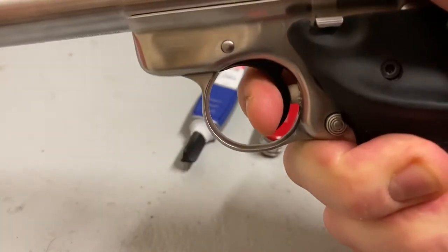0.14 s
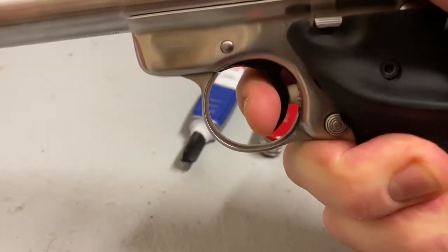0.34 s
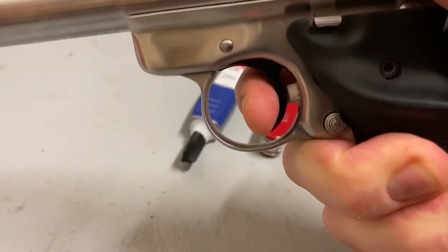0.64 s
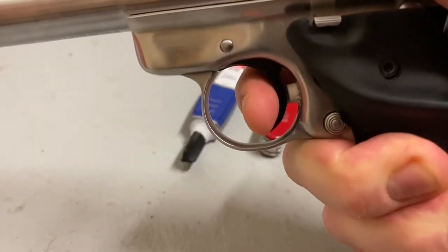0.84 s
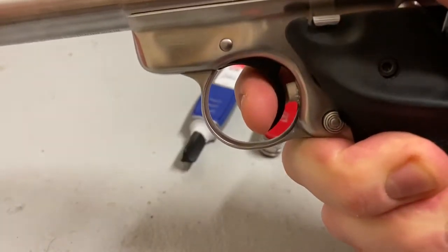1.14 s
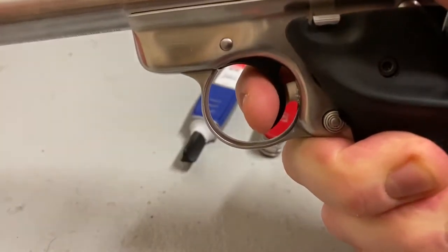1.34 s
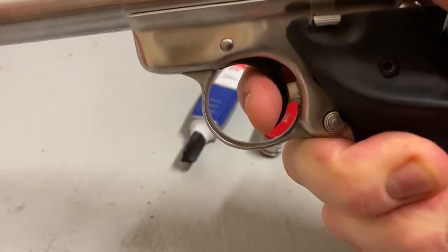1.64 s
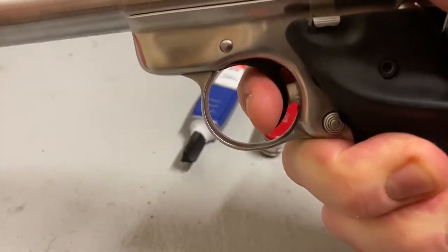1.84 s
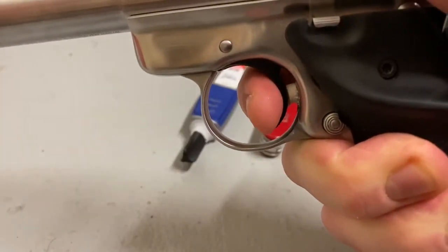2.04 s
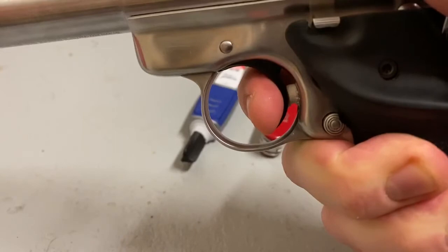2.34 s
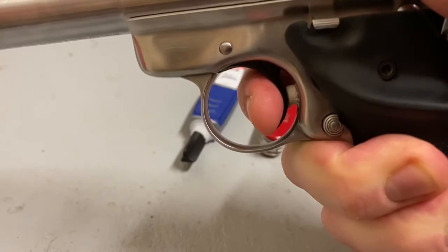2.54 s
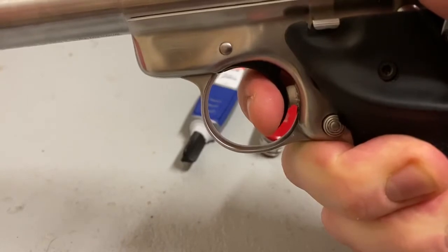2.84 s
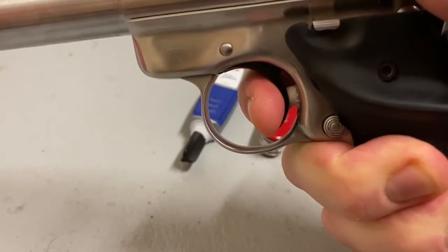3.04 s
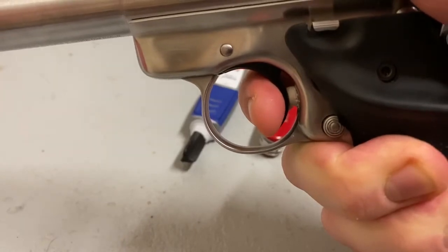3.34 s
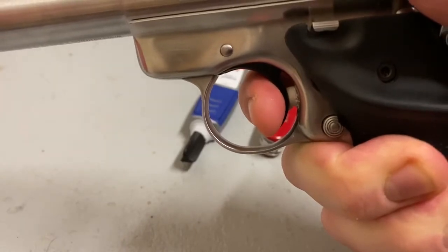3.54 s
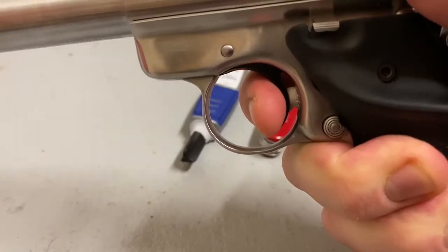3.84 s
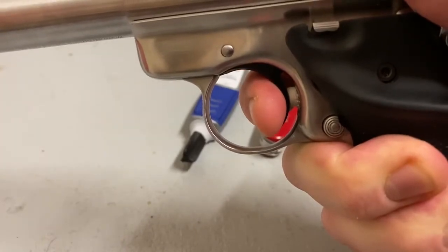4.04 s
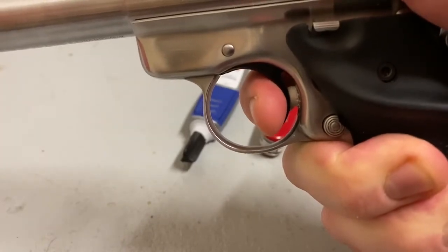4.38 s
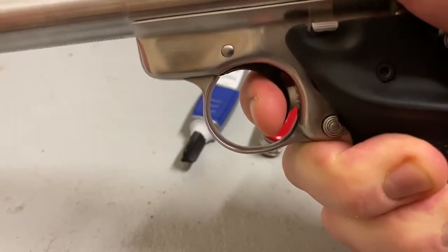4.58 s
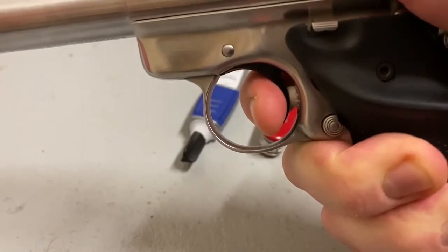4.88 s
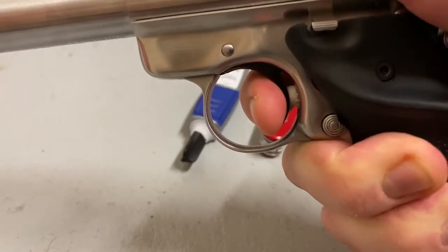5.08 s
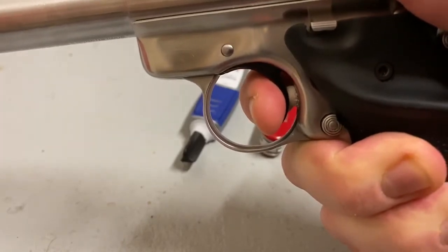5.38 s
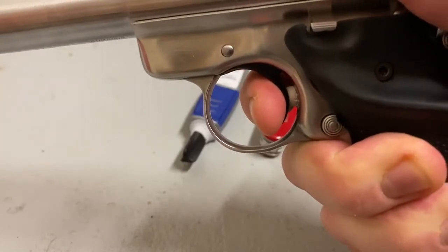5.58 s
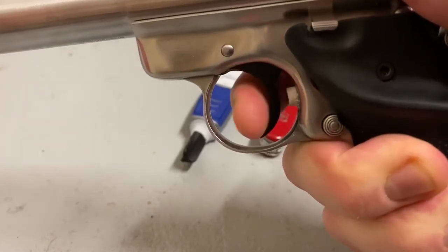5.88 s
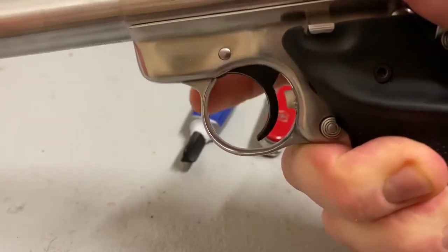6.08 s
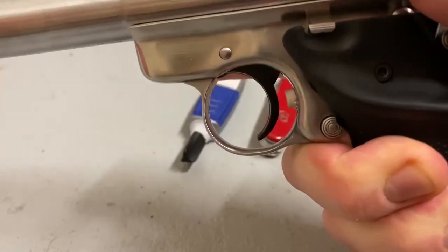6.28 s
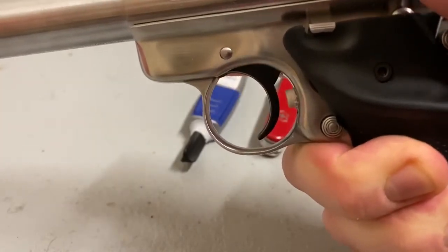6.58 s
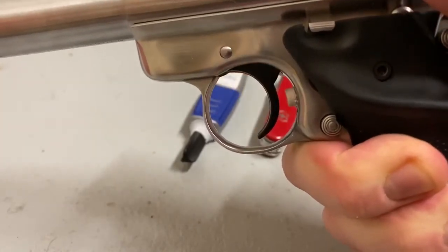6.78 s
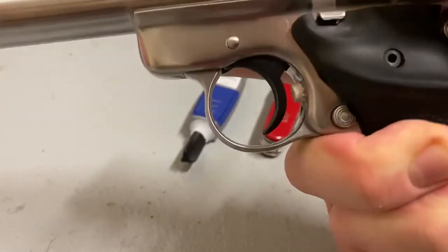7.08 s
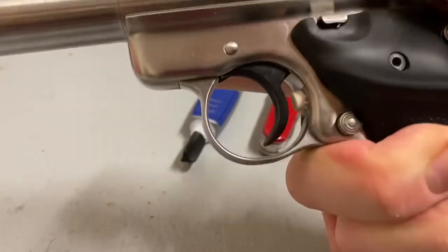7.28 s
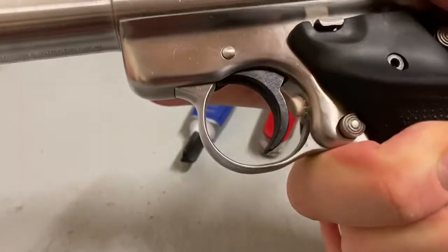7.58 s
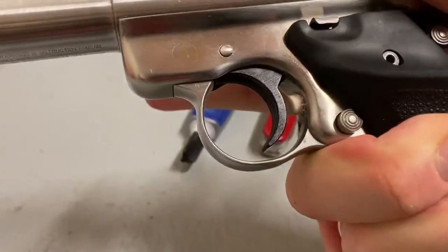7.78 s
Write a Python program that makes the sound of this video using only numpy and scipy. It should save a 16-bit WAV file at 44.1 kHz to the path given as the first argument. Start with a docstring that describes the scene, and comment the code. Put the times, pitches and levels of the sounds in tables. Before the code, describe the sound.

A steel pistol is dry-fired very close to the microphone in a small humming room. A crisp, thin trigger click comes first. After a few seconds the hammer falls with a sharp, loud clack, a short low thud and a fluttering deep boom. The hum gradually sinks and returns, fine ticks mark the trigger's release, and a hand rubs faintly on the grip.

```python
"""A steel pistol is dry-fired close to the microphone in a small room with a motor hum and rushing air throughout.
First the trigger takes up with a click. Later the sear breaks and the hammer falls with a clack, a low thud
and a deep boom, while a limiter turns the sound down for a moment. Then the hum sinks and comes back, the
linkage slides and ticks back as the trigger is let go, and the hand rubs on the grip.
Steel is short noise plus ringing tones, the thud and boom are fading sines, and the air is coloured noise."""
import sys
import numpy as np
from scipy import signal
from scipy.fft import rfft, irfft, next_fast_len
from scipy.io import wavfile
from scipy.ndimage import uniform_filter1d, minimum_filter1d

SR = 44100
rng = np.random.default_rng(int(sys.argv[2]) if len(sys.argv) > 2 else 0)


def inscribe(sig):
    """Save sig as 16-bit PCM at rate SR to the path in sys.argv[1].

    A 1-D sig is mono; a 2-D sig holds one channel per row.
    Samples are clipped to [-1, 1] before scaling.
    """
    pcm = np.round(np.clip(np.atleast_2d(sig).T, -1, 1) * 32767)
    wavfile.write(sys.argv[1], SR, pcm.astype(np.int16))


N = 349354
TIME = np.arange(N) / SR  # seconds

# Steel hitting steel. Each row: start in seconds, overall level in dB, clatter decay time in ms,
# low and high edge of the clatter in Hz, frame ring in dB, linkage ring in dB (both before the overall level).
CONTACTS = [ (1.1525, -11, 1.33, 3600, 15500, -21.5, -4), (1.1538, -19.5, 3.6, 3553, 15500, -13, 0.5),
            (4.4995, -8, 5.5, 2380, 12000, 2, -14), (4.5040, 3, 1.5, 3800, 15000, -11, -5),
            (4.5050, -2.5, 2, 2200, 14100, 9.5, -9.5), (4.5074, -4.5, 3.5, 2200, 13000, 6.5, -9),
            (5.4300, -78.5, 34, 5500, 7500, -30, -31), (5.9108, -44, 4, 1405, 6990, 7.5, -12.5),
            (5.922, -31, 1.3, 3220, 13000, -8, -6.5), (5.9541, -20, 1.04, 6100, 14900, -25, -15.5),
            (5.9795, -65, 2.7, 2000, 13000, 2, -10.5), (6.0495, -49.5, 1.3, 3900, 9000, -3, -13),
            (6.071, -60.5, 4.0, 5000, 15500, 1, -12)]
# Ringing tones of the frame and barrel. Each row: pitch in Hz, relative level in dB,
# time to fall by 60 dB in seconds, left minus right in dB.
FRAME_MODES = [(600, -17, .016, 0), (1005, -19, .024, -3), (1900, -10, .017, 4), (2030, -15, .024, 5),
               (2960, -16, .016, 5), (3150, -13, .016, 5), (3290, -18, .018, 4), (3160, -73, 1.0, 2),
               (4226, -21, .035, 0), (4580, -8, .016, 0), (4750, -14, .014, 0), (4940, -8, .016, 0),
               (4560, -60, .3, 2), (4990, -56, .3, 2), (5300, -39, .17, 2), (5820, -17, .018, 1),
               (7040, -17, .014, 1), (9250, -19, .02, -1), (9520, -17, .016, -1), (10110, -15, .018, -1),
               (13900, -20, .02, -1), (15000, -19, .018, -1)]
# Ringing tones of the trigger bar and sear, with the same columns as the frame.
LINKAGE_MODES = [(1020, -22, .035, -1), (1920, -19, .045, 6), (2180, -14, .022, 6), (2650, -17, .018, 4),
                 (4060, -16, .022, 2), (4630, -14, .02, 2), (5850, -10, .018, 1), (6450, -11, .017, 1),
                 (7100, -10, .018, 1), (9020, -11, .014, 0), (9890, -8, .016, 0), (10700, -16, .014, 0),
                 (14100, -13, .01, 1)]
# The linkage slides as the trigger returns. Each row: middle in seconds, level in dB, half length in seconds.
SLIDES = [(5.945, -65, 0.045), (6.068, -69.5, 0.022)]
# Band of the sliding noise: low and high edge in Hz.
SLIDE_BAND = (1400, 4600)
# The pistol lies to the left. One row: low edge in Hz, high edge in Hz, share gained left and lost right.
LEFTWARD = (1500, 4300, .19)
# The hammer's jolt. Each row: start in seconds, level in dB, start pitch in Hz, end pitch in Hz,
# glide, rise and decay times in ms.
THUDS = [(4.5063, 9.1, 400, 56, 4.2, 1.5, 8.7), (4.5800, -19, 260, 50, 3.5, 1.8, 10.0)]
# The hand shifts on the grip. Each row: middle in seconds, level in dB before the unevenness, half length in seconds.
RUBS = [(6.35, -70, .15), (6.68, -59, .1), (7.4, -72, .35)]
# Colour of the rubbing. Each row: frequency in Hz, relative level in dB per Hz.
GRIP_COLOUR = [(60, -20), (180, 7), (290, 0.5), (420, -8), (800, -36), (3000, -62.5)]
# Reflections of the room. Each row: frequency in Hz, level in dB, time to fall by 60 dB in seconds.
ROOM = [(301, -28.5, .2), (1008, -19, 0.073), (1988, -12.5, .26), (3200, -18, 0.2), (5000, -16, 0.23),
        (9100, -20, 0.22), (15013, -22.5, 0.22)]
# Two motors at nearly the same speed. One row: middle pitch in Hz, peak level of the stronger one in dB,
# time of a loudest moment in seconds, beats per second.
MOTORS = (48.8, -60.5, 1.45, .378)
# Higher tones of the hum. Each row: pitch in Hz, rms level in dB before the waver, spread of the waver in dB.
HUM_OVERTONES = [(94.5, -59.5, 4), (149.8, -61, 3), (198, -75, 1), (496, -73, 2.5)]
# Colour of the rumble. Each row: frequency in Hz, relative level in dB per Hz.
RUMBLE_COLOUR = [(20, -43), (38, -22.5), (50, -19), (65, -4), (85, 3), (102, 5.5), (120, 4.5), (140, -8.5),
                 (155, -9), (175, -14.5), (198, -2), (225, -17), (300, -63.5), (2000, -100)]
# Colour of the air that both sides share. Each row: frequency in Hz, relative level in dB per Hz.
AIR_COLOUR = [(40, -24.5), (150, -6.5), (280, -4.5), (370, 1.5), (600, -5), (870, -10), (1200, -12.5),
              (2400, -22), (4000, -30.5), (7000, -39), (8400, -45), (10000, -48), (12000, -55),
              (16000, -62.5)]
# Colour of the air that is opposite left and right, with the same columns.
AIR_SIDE_COLOUR = [(40, -15), (100, -6), (240, 2.5), (320, -0.5), (750, -8), (1020, -11), (2000, -22),
                   (4000, -35), (8000, -42.5), (10000, -50.5), (16000, -63)]
# Resonances in the air. Each row: centre in Hz, width in Hz, lift in dB.
AIR_PEAKS = [(490.8, 40, 10), (759.2, 48, 8.5), (990, 130, 8.5), (1907, 270, 5), (2780, 570, 3)]
# How alike the two microphone ports hear noise. Each row: frequency in Hz, likeness from 0 to 1.
LIKENESS = [(500, .95), (2000, .8), (5000, .65), (7500, 0), (15000, .05)]
# Colour of the microphone. Each row: centre in Hz, width in Hz, lift or cut in dB.
MICROPHONE = [(5910, 550, -1), (8300, 900, -3.5), (9900, 1300, 6), (11770, 1000, -6.5)]

BOOM_HZ, BOOM_BEAT_HZ, BOOM_DB, BOOM_T60_S = 48.1, 6.7, -23, 0.8
SAG_START_S, SAG_END_S, SAG_DB_PER_S, SAG_RETURN_S = 4.96, 5.85, 10, 0.027
RUMBLE_DB, AIR_DB, AIR_SIDE_DB = -51.5, -61, -61.5
LIMIT_DB, LOOK_AHEAD_S, HOLD_S, RELEASE_DB_PER_S = -9, 0.0075, 0.12, 129.5
CUTOFF_HZ = 15800


def action():
    """Each steel contact is a short burst of clatter that sets the frame and the linkage ringing."""
    out = np.zeros((2, N))
    t = TIME[:SR // 3]
    attack = 1 - np.exp(-t / 0.00035)
    for start_s, level_db, decay_ms, low_hz, high_hz, frame_db, linkage_db in CONTACTS:
        fade = np.exp(-1000 * t / decay_ms)
        clatter = rms_one(band(stereo_noise(len(t)), low_hz, high_hz)) * fade
        frame = from_db(frame_db) * ringing(FRAME_MODES, t, spread_db=-1.0)
        linkage = from_db(linkage_db) * ringing(LINKAGE_MODES, t, spread_db=0.5)
        add(out, start_s, (clatter + frame + linkage) * attack * from_db(level_db))
    return out


def ringing(modes, t, spread_db):
    """Struck steel rings in many fading tones; each blow gives them new strengths and phases."""
    hz, level_db, t60_s, pan_db = np.array(modes).T[:, :, None, None]
    strength, skew = rng.standard_normal((2, len(modes), 1, 1))
    # the less alike the ports are at a pitch, the further out of step they hear it
    angle = np.arccos(np.clip(at_hz(LIKENESS, hz), 0, 1))
    apart = angle * np.sign(skew + 1) / 2 * [[1], [-1]]
    phase = 2 * np.pi * (hz * t + rng.random((len(modes), 1, 1))) + apart
    loudness = from_db(level_db + spread_db * strength - 60 * t / t60_s)
    return np.sum(panned(pan_db) * loudness * np.sin(phase), axis=0)


def slide(catches_per_s):
    """Steel slides on steel in a stream of tiny catches at random moments."""
    catches = (rng.random(N) < catches_per_s / SR) * stereo_noise(N)
    return strokes(SLIDES) * rms_one(band(catches, *SLIDE_BAND, order=1))


def thud():
    """The blow jolts gun and hand: a swing that dies fast while its pitch drops."""
    out = np.zeros((2, N))
    t = TIME[:SR // 5]
    port_lag = np.array([[0], [.5]])  # radians, left and right
    for start_s, level_db, start_hz, end_hz, *spans_ms in THUDS:
        glide_s, rise_s, decay_s = np.array(spans_ms) / 1000
        # turns of the swing so far: the pitch added up over time
        turns = end_hz * t + (start_hz - end_hz) * glide_s * (1 - np.exp(-t / glide_s))
        swing = np.sin(2 * np.pi * turns - port_lag)
        envelope = (1 - np.exp(-t / rise_s)) * np.exp(-t / decay_s)
        add(out, start_s, from_db(level_db) * envelope * swing)
    return out


def boom():
    """Two close, deep tones start with the hammer's jolt and beat against each other as they die."""
    t = np.maximum(TIME - THUDS[0][0], 0)  # stays at zero, so silent, until the jolt
    lower = np.sin(2 * np.pi * (BOOM_HZ - BOOM_BEAT_HZ / 2) * t)
    upper = np.sin(2 * np.pi * (BOOM_HZ + BOOM_BEAT_HZ / 2) * t)
    return from_db(BOOM_DB - 60 * t / BOOM_T60_S) * (lower - upper)


def grip():
    """Skin rubs dully and unevenly on the grip as the pistol is turned."""
    unevenness = from_db(2.2 * drift(30))
    return strokes(RUBS) * unevenness * noise(GRIP_COLOUR)


def room(x, build_s):
    """Scattered reflections build up quickly and die at their own pace in each band."""
    t = TIME[:SR // 2]
    response = 0
    edges_hz = np.geomspace(250, 17000, 13)
    for low_hz, high_hz in zip(edges_hz, edges_hz[1:]):
        middle_hz = np.sqrt(low_hz * high_hz)
        fade = from_db(-60 * t / at_hz(ROOM, middle_hz, axis=2))
        envelope = fade * (1 - np.exp(-t / build_s))
        gain = from_db(at_hz(ROOM, middle_hz)) / np.sqrt(np.sum(envelope ** 2))
        response = response + gain * envelope * band(rng.standard_normal((2, len(t))), low_hz, high_hz)
    return signal.fftconvolve(x, response, axes=1)[:, :N]


def motors():
    """Two nearly equal low tones slowly swell and weaken together, under wavering higher tones."""
    middle_hz, level_db, swell_s, beats_per_s = MOTORS
    t = TIME - swell_s
    slower = np.sin(2 * np.pi * (middle_hz - beats_per_s / 2) * t)
    faster = .75 * np.sin(2 * np.pi * (middle_hz + beats_per_s / 2) * t)
    hum = from_db(level_db) * (slower + faster)
    for hz, overtone_db, waver_db in HUM_OVERTONES:
        loudness = from_db(overtone_db + waver_db * drift(6.2)) * np.sqrt(2)  # rms to peak
        hum = hum + loudness * np.sin(2 * np.pi * hz * TIME + 0.27 * drift(5))
    return hum


def air():
    """Rushing air is resonant noise: one part equal on both sides, one part opposite."""
    middle = from_db(AIR_DB) * noise(AIR_COLOUR, AIR_PEAKS)
    side = from_db(AIR_SIDE_DB) * noise(AIR_SIDE_COLOUR, AIR_PEAKS[1:])
    return middle + side * [[1], [-1]]


def background():
    """Hum and rumble sink steadily once and come back almost at once, while the air stays steady."""
    sag_times = [SAG_START_S, SAG_END_S, SAG_END_S + SAG_RETURN_S]
    sag_db = SAG_DB_PER_S * np.interp(TIME, sag_times, [0, SAG_END_S - SAG_START_S, 0])
    rumble = from_db(RUMBLE_DB) * noise(RUMBLE_COLOUR)
    return from_db(-sag_db) * (motors() + rumble) + air()


def microphone(x):
    """The microphone ports lift or cut a few treble bands, each with a peaking filter."""
    for hz, width_hz, gain_db in MICROPHONE:
        turn = -2 * np.cos(2 * np.pi * hz / SR)
        half = np.tan(np.pi * width_hz / SR)
        gain = from_db(gain_db / 2)
        above = [1 + half * gain, turn, 1 - half * gain]
        below = [1 + half / gain, turn, 1 - half / gain]
        x = signal.lfilter(above, below, x)
    return x


def limiter(x):
    """A level over the ceiling turns the gain down; it stays down for a moment, then climbs back."""
    window, hold = SR // 250, int(HOLD_S * SR)  # samples
    power = uniform_filter1d(np.mean(x ** 2, axis=0), window)
    level_db = 10 * np.log10(np.maximum(power, 1e-12))
    held_db = minimum_filter1d(np.minimum(LIMIT_DB - level_db, 0), hold, origin=(hold - 1) // 2)
    # the gain may drop freely but climbs no faster than the release
    climb_db = RELEASE_DB_PER_S * TIME
    gain_db = np.minimum.accumulate(held_db - climb_db) + climb_db
    smooth_db = uniform_filter1d(gain_db, window)
    return x * from_db(np.interp(TIME + LOOK_AHEAD_S, TIME, smooth_db))


def from_db(db):
    """Turn decibels into gain."""
    return 10 ** (np.asarray(db) / 20)


def rms_one(x):
    """Scale a sound to an rms of 1."""
    return x / np.sqrt(np.mean(x ** 2) + 1e-20)


def panned(pan_db):
    """Left and right gains for a level difference."""
    return from_db(pan_db * np.array([[.5], [-.5]]))


def at_hz(points, hz, axis=1):
    """Read a table column at any frequency, with straight lines on a log-frequency axis."""
    table = np.array(points)
    return np.interp(np.log(np.maximum(hz, 1)), np.log(table[:, 0]), table[:, axis])


def band(x, low_hz, high_hz, order=2):
    """Keep only the sound between two frequencies."""
    high_hz = min(high_hz, .48 * SR)
    low_hz = min(low_hz, .9 * high_hz)
    return signal.sosfilt(signal.butter(order, [low_hz, high_hz], "band", fs=SR, output="sos"), x)


def noise(spectrum, peaks=()):
    """Steady noise of a given colour, with resonances on top and an rms of 1."""
    size = next_fast_len(N)
    white = rfft(rng.standard_normal(size))
    hz = np.arange(len(white)) * SR / size
    colour_db = at_hz(spectrum, hz)
    for centre_hz, width_hz, lift_db in peaks:
        colour_db = colour_db + lift_db / (1 + (2 * (hz - centre_hz) / width_hz) ** 2)
    return rms_one(irfft(white * from_db(colour_db), size)[:N])


def stereo_noise(size):
    """White noise at two microphone ports: alike in the bass, nearly unrelated in the high treble."""
    mid, side = rfft(rng.standard_normal((2, size)))
    hz = np.arange(len(mid)) * SR / size
    alike = np.clip(at_hz(LIKENESS, hz), 0, 1)
    return irfft(np.sqrt(1 + alike) * mid + np.sqrt(1 - alike) * side * [[1], [-1]], size)


def drift(rate):
    """Slow random wander with an rms of 1, through a given number of random points per second."""
    knots = rng.standard_normal(400)
    return rms_one(np.interp(TIME * rate, np.arange(len(knots)), knots))


def strokes(rows):
    """Gain of a series of strokes: each swells and fades in a bell shape."""
    return sum(from_db(level_db) * np.exp(-((TIME - middle_s) / half_s) ** 2)
               for middle_s, level_db, half_s in rows)


def add(out, start_s, sound):
    """Mix a sound in from its start time."""
    start = int(round(start_s * SR))
    out[..., start:start + sound.shape[-1]] += sound[..., :N - start]


def scene():
    """The pistol close up and a little to the left, its reflections and the humming room."""
    steel = action() + slide(catches_per_s=2900)
    steel = steel + room(steel, build_s=.005)
    low_hz, high_hz, share = LEFTWARD
    steel = steel + share * band(steel, low_hz, high_hz) * [[1], [-1]]
    return steel + thud() + boom() + grip() + background()


def record(dry):
    """The microphone colours the treble, the limiter ducks the blow, peaks are rounded and the top is cut."""
    limited = limiter(microphone(dry))
    rounded = 1.3 * np.tanh(limited / 1.3)
    return signal.sosfilt(signal.ellip(10, .1, 80, CUTOFF_HZ, fs=SR, output="sos"), rounded)


dry = scene()
out = record(dry)
inscribe(out)
```